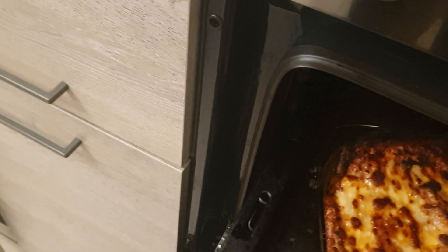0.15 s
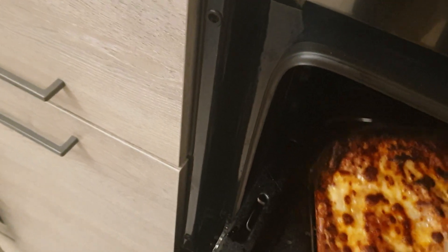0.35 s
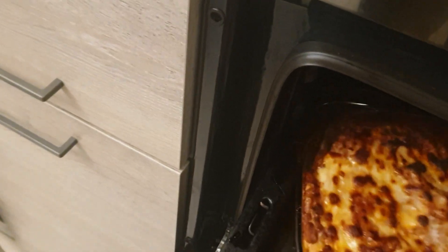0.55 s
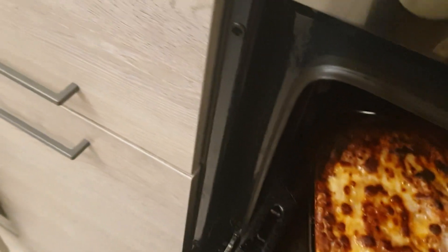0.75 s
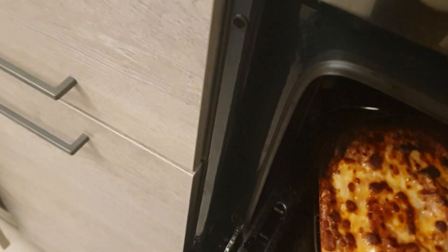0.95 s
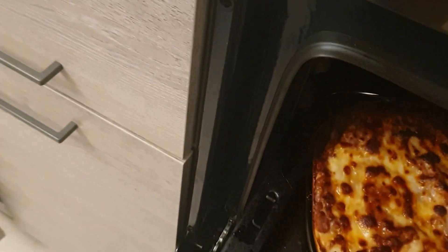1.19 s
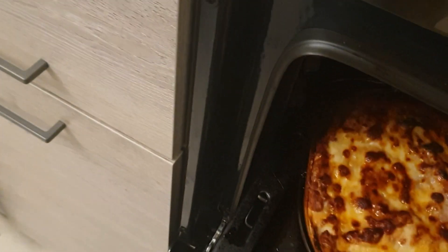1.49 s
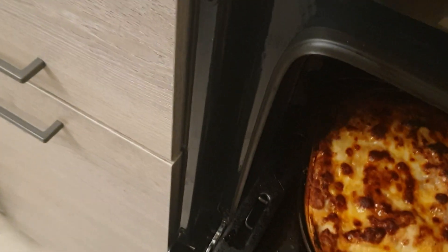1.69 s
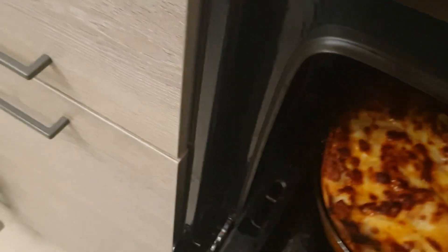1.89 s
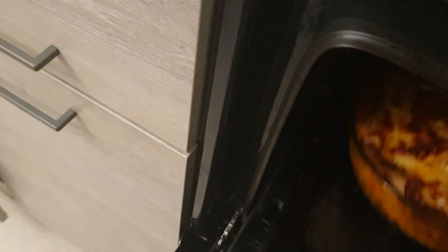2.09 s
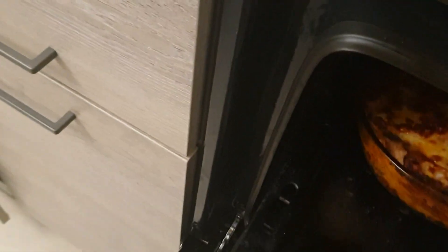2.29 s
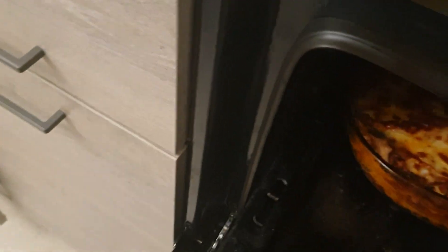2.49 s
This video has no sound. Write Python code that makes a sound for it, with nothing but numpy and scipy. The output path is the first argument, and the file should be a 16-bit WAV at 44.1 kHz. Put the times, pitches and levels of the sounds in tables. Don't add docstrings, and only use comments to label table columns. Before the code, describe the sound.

A glass baking dish drags over an oven's wire rack, a gritty cloth-and-glass hiss swelling from 0.1 to 0.5 seconds. A boomy metallic knock with quick rebound lands at 0.56, more rubbing follows, then a shorter, duller knock at 1.47. Light clacks near 1.96 lead to the loudest rattling double bang at 2.12 and a bump at 2.27. Faint sizzle and fan hum underlie it; short kitchen reverberation.

```python
import sys
import numpy as np
from scipy import signal
from scipy.fft import rfft, irfft, next_fast_len
from scipy.io import wavfile
from scipy.ndimage import uniform_filter1d, map_coordinates

SR = 44100
rng = np.random.default_rng(int(sys.argv[2]) if len(sys.argv) > 2 else 0)


def master_out(mix):
    frames = np.transpose(np.atleast_2d(mix))
    ceiling = np.clip(frames, -1, 1)
    pcm = np.round(ceiling * 32767).astype(np.int16)
    wavfile.write(sys.argv[1], SR, pcm)


def volts_from_db(level):
    exponent = np.asarray(level, float) / 20
    return 10 ** exponent


N = 116865

# (frequency [Hz], level [dB per Hz])
HUM_COLOUR = [(22, -2.5), (60, 3.5), (200, -17), (480, -8), (750, -12), (1500, -19.5), (5000, -26),
              (15800, -24)]
# (frequency [Hz], level [dB per Hz])
RUMBLE_COLOUR = [(25, 4), (55, -4.5), (130, 6.5), (250, -3.5), (500, -10.5), (1000, -14), (1500, -50)]
# (time [s], level [dB])
RUMBLE_LEVEL = [(0, -56.5), (.2, -44), (.33, -54), (.55, -40.5), (.9, -49.5), (1.1, -47.5), (1.5, -49.5),
                (1.82, -50.5), (2.0, -37), (2.07, -40.5), (2.2, -35), (2.45, -47), (2.65, -61.5)]
# (frequency [Hz], width [Hz], level [dB])
CAVITY_PEAKS = [(477, 31, 4.5), (708, 50, -8.5), (863, 18, -9.5), (1640, 110, 6), (2100, 78, 1),
                (2600, 79, 6)]

# (time [s], level [dB])
SIZZLE_LEVEL = [
    (0, -60),
    (.8, -59),
    (1.2, -57),
    (1.7, -58.5),
    (2.3, -69),
    (2.36, -78),
]
# (frequency [Hz], level [dB per Hz])
SIZZLE_COLOUR = [(2500, -48), (5000, 1), (11000, 2), (15800, -9)]

# (frequency [Hz], time to fall 60 dB [s])
ROOM_T60 = [(100, .55), (1000, .45), (4000, .4), (12000, .35)]

# (time [s], level [dB])
DRAG_LEVEL = [(0, -63), (.07, -58.5), (.12, -48.5), (.26, -48), (.33, -51.5), (.4, -45), (.45, -42),
              (.5, -39.5), (.55, -43), (.58, -53), (.7, -43.5), (.8, -53), (.95, -60.5), (1.04, -49.5),
              (1.15, -60.5), (1.43, -54), (1.55, -57.5), (2.085, -53.5), (2.12, -47.5), (2.31, -55),
              (2.36, -66)]
# (frequency [Hz], level [dB per Hz])
DRAG_COLOUR = [(35, -38), (130, -33), (400, -16), (1000, -14.5), (3000, -16), (4500, -18), (7500, -18),
               (15800, -22)]
# (frequency [Hz], width [Hz], level [dB])
RACK_PEAKS = [(140, 40, 14), (414, 60, 1), (945, 130, -2), (2060, 230, -11.5), (2590, 350, 0.5)]

# (time [s], peak [dB], frequency [Hz], rise [s], time to fall 60 dB [s])
CAVITY_BOOMS = [(0.14, -34.5, 137.2, 0.032, 0.37), (.42, -32.5, 396, 0.013, 0.14),
                (0.5646, -14, 194, 0.014, 0.25), (.567, -14, 166, 0.0041, 0.18),
                (.562, -19, 291, 0.003, 0.15), (.58, -29, 253, .01, 0.43),
                (0.5632, -12.5, 89.7, 0.011, 0.21), (0.572, -17.5, 125, 0.005, 0.22),
                (0.648, -22, 140, 0.0041, 0.11), (.72, -30, 118.4, 0.0065, .12),
                (1.158, -26.5, 122.5, 0.018, 0.13), (1.468, -26, 202, 0.0022, 0.086),
                (1.477, -21, 99, 0.0035, 0.18), (1.501, -38, 54.6, 0.055, 0.78),
                (1.503, -11, 150, 0.0036, 0.053), (1.554, -25, 133, 0.0036, 0.079),
                (1.859, -34, 67.4, 0.024, 0.44), (1.87, -35.5, 143, 0.0092, .35),
                (1.953, -22.5, 197.5, 0.0075, 0.24), (1.965, -23.5, 103, 0.0067, 0.12),
                (2.085, -14, 195, 0.017, 0.28), (2.1134, -6, 161, 0.0046, 0.12),
                (2.111, -23, 117, 0.0047, .2), (2.115, -12, 259.6, 0.0029, 0.09),
                (2.15, -28.5, 288, 0.0066, 0.28), (2.117, -21, 107.4, 0.027, 0.25),
                (2.1321, -2, 155, 0.0058, 0.099), (2.175, -25, 155.5, 0.012, 0.3),
                (2.233, -28, 164, 0.0058, .08), (2.275, -10.5, 125.4, 0.0038, 0.068),
                (2.27, -24, 287, 0.0039, 0.096), (2.285, -21.5, 198.6, 0.0051, 0.29),
                (2.363, -19.5, 166.5, 0.0091, 0.086), (2.399, -34, 73.6, 0.031, 0.44)]

# (frequency [Hz], level [dB], time to fall 60 dB [s])
STOP_TONES = [(319, 3, .1), (389.6, -7.5, 0.27), (458, -13.5, 0.35), (518, -11, 0.12), (852, -8.5, 0.1),
              (979, -12.5, 0.37), (1210, -22, .2), (1574, -7, 0.084), (1990, -2.5, 0.06), (2230, -10, .06),
              (2597, 3.5, 0.036), (2785, -1.5, 0.053), (3087, -11.5, 0.07)]
RAIL_TONES = [(331, -8, 0.27), (478, -6.5, 0.18), (525.5, -3.5, 0.24), (895.5, -2, 0.2), (1620, -5, 0.35),
              (1640, -11, 0.23), (1700, 4.5, 0.07), (2013, -15, 0.13), (2350, 8, 0.049), (2640, -13.5, .3),
              (2860, -20, 0.061)]
WALL_TONES = [(496.4, -5, 0.3), (642, -8, 0.23), (961, -12, 0.28), (1089, -7.5, .17), (1567, -5, 0.19),
              (1755, -17, 0.17), (1954, -15, .2), (2213, -18, 0.22), (2596, -11, 0.11), (2845, -9, 0.22)]
DISH_TONES = [(322, -0.5, 0.19), (496.5, -7.5, 0.4), (613, 0, 0.19), (823, -9, 0.28), (920, -8, 0.28),
              (1494, -8.5, 0.085), (1565, -2, .22), (1700, -13, .12), (2100, -10, 0.086),
              (2300, -0.5, 0.086), (2610, -12, 0.088)]
# (time [s], ring [dB], clatter [dB], clatter time to fall 60 dB [s], rise [s])
STOP_CONTACTS = [
    (0.5604, -18.5, -21, 0.15, 0.00045),
    (.573, -20.5, -31, 0.44, 0.00046),
]
RAIL_CONTACTS = [
    (.985, -64, -65, 0.27, 0.0025),
    (1.346, -62, -66, 0.13, 0.0032),
    (1.468, -28.5, -31.5, 0.28, 0.0011),
    (1.487, -44, -43, 0.32, 0.0011),
]
WALL_CONTACTS = [
    (1.028, -58, -52, 0.46, 0.013),
    (2.092, -41.5, -37, 0.23, 0.0064),
    (2.114, -21, -29, 0.19, 0.00052),
    (2.119, -29, -27, 0.29, 0.00047),
    (2.132, -24.5, -30.5, 0.36, 0.00061),
    (2.25, -40, -43, 0.21, 0.0024),
    (2.273, -34.5, -38, 0.44, 0.0044),
]
DISH_CONTACTS = [
    (1.79, -49.5, -55, 0.18, 0.011),
    (1.955, -35.5, -38, 0.16, 0.0056),
    (1.972, -35.5, -40.5, 0.25, 0.0036),
    (1.992, -39, -45.5, 0.24, 0.0066),
]
# (frequency [Hz], level [dB per Hz])
CLATTER_COLOUR = [(150, -9.5), (270, -3), (530, -10.5), (1280, -16.5), (2000, -11.5), (2900, -11),
                  (3400, -20.5), (7000, -33.5), (15800, -46)]
# (frequency [Hz], share of the clatter time [ratio])
CLATTER_SHARE = [(300, 1.43), (1000, 2.34), (3000, 0.55), (8000, 1.9)]
CLATTER_TILT = [
    1,
    -9,
    0,
    -6,
]

# (frequency [Hz], likeness [0 to 1])
PORT_LIKENESS = [(60, 1), (300, 0.96), (640, 0.79), (1400, 0.046), (3000, 0.17), (8000, 0.19)]
# (frequency [Hz], left minus right [dB])
PORT_LEAN = [(60, -4.5), (300, -2), (1200, -1.2), (2500, 3), (6000, 3), (10000, -3.5)]
# (frequency [Hz], level [dB])
MIC_COLOUR = [(22, -30), (45, 0), (7300, 1.5), (8500, -6.5), (10500, -0.5), (13500, 1), (14500, -3.5),
              (15500, -0.5)]


def unit(x):
    return x / np.sqrt(np.mean(x ** 2) + 1e-20)


def along(points, hz):
    f, v = np.transpose(points)
    return np.interp(np.log(hz + 1), np.log(f + 1), v)


def curve(rows):
    return np.interp(np.arange(N) / SR, *np.transpose(rows))


def wobble(rate, size=N):
    knots = rng.standard_normal(int(N * 90 / SR) + 8)
    return map_coordinates(knots, [np.arange(size) * min(rate, 90) / SR])


def filtered(x, response):
    n = x.shape[-1]
    m = next_fast_len(n + SR // 4)
    return irfft(rfft(x, m) * response(np.fft.rfftfreq(m, 1 / SR)), m)[..., :n]


def resonant(x, peaks):
    def response(f):
        ringing = sum(volts_from_db(db) * 1j * f * width / (centre * centre - f * f + 1j * f * width)
                      for centre, width, db in peaks)
        return 1 + ringing
    return filtered(x, response)


def half_angle(hz):
    return np.arccos(np.clip(along(PORT_LIKENESS, hz), -1, 1)) / 2


def paired(pair, spectrum):
    def response(hz):
        return volts_from_db(along(spectrum, hz)) * [np.cos(half_angle(hz)), np.sin(half_angle(hz))]
    mid, side = filtered(pair, response)
    return unit(np.array([mid + side, mid - side]))


def dying(t60_of, size):
    hz, t, z = signal.stft(rng.standard_normal((2, size)), SR, nperseg=128)
    fading = z * volts_from_db(-60 * t / t60_of(hz)[:, None])
    return signal.istft(fading, SR, nperseg=128)[1][:, :size]


def hum():
    rumble = paired(resonant(rng.standard_normal((2, N)), CAVITY_PEAKS), RUMBLE_COLOUR)
    rumble = rumble * volts_from_db(curve(RUMBLE_LEVEL) + 2.0 + 1.4 * wobble(22.06))
    fan = paired(resonant(rng.standard_normal((2, N)), CAVITY_PEAKS), HUM_COLOUR)
    return volts_from_db(-51.5 + 0.27 * wobble(1.7)) * fan + rumble


def sizzle():
    spits_per_s, spread_db = 500, 4
    bursts = rng.random(N) < spits_per_s / SR
    pops = bursts * volts_from_db(spread_db * np.minimum(rng.exponential(size=N), 3))
    puffs = uniform_filter1d(pops, size=40) * rng.standard_normal((2, N))
    return volts_from_db(curve(SIZZLE_LEVEL)) * paired(puffs, SIZZLE_COLOUR)


def kitchen(x):
    out, step = np.zeros((2, N + 2 * SR)), SR // 3
    for start in range(0, N, step):
        tail = dying(lambda f: along(ROOM_T60, f), size=SR * 3 // 4)
        tail = paired(tail, [(20, 0.0045), (20000, 0)])
        wet = signal.fftconvolve(x[None, start:start + step], tail / np.linalg.norm(tail[0]), axes=1)
        out[:, start + 200:][:, :wet.shape[1]] += wet
    return out[:, :N]


def drag():
    grains_per_s, spread_db, grain_db = 1500, 3, -8
    grains = rng.random((2, N)) < grains_per_s / SR
    grit = grains * volts_from_db(spread_db * np.minimum(rng.exponential(size=(2, N)), 4))
    grit = unit(grit * rng.standard_normal((2, N)))
    rub = resonant(rng.standard_normal((2, N)) + volts_from_db(grain_db) * grit, RACK_PEAKS)
    stutter_db = 1.2 * (wobble(70) + wobble(35.11))
    return volts_from_db(curve(DRAG_LEVEL) + 4 + stutter_db) * paired(rub, DRAG_COLOUR)


def booms():
    out, t = np.zeros(N + SR), np.arange(SR // 2) / SR
    for s, db, hz, rise, t60 in CAVITY_BOOMS:
        swell = (1 - np.exp(-t / rise)) * volts_from_db(db - 60 * t / t60)
        wander = 0.15 * wobble(32.0, size=len(t))
        out[round(s * SR):][:len(t)] += swell * np.sin(2 * np.pi * hz * t + wander)
    return out[:N]


def ringing(tones, t):
    hz, db, t60 = np.transpose(tones)[:, :, None]
    apart = half_angle(hz) * rng.standard_normal(hz.shape)
    wander = 0.5 * np.array([wobble(83.6, size=len(t)) for _ in tones])
    phase = 2 * np.pi * hz * t + wander + 2 * np.pi * rng.random(hz.shape)
    buzz_db = 3.5 * np.array([wobble(29.4, size=len(t)) for _ in tones]) * np.minimum(t / 0.014, 1)
    level = volts_from_db(db + buzz_db - 60 * t / t60)
    return np.array([(level * np.sin(phase + side * apart)).sum(0) for side in (1, -1)])


def clattering(t60, tilt_db, t):
    clatter = paired(dying(lambda f: t60 * along(CLATTER_SHARE, f), size=len(t)), CLATTER_COLOUR)
    clatter = filtered(clatter, lambda f: volts_from_db(tilt_db * np.log2(np.maximum(f / 3000, 1))))
    start_rms = np.sqrt(np.mean(clatter[:, :SR // 100] ** 2))
    crack_db, crack_t60 = 3.5, 0.051
    return clatter / start_rms * (1 + volts_from_db(crack_db - 60 * t / crack_t60))


def knocks():
    out, t = np.zeros((2, N + SR)), np.arange(SR // 2) / SR
    places = (STOP_TONES, RAIL_TONES, WALL_TONES, DISH_TONES)
    contacts = (STOP_CONTACTS, RAIL_CONTACTS, WALL_CONTACTS, DISH_CONTACTS)
    for tones, tilt_db, hits in zip(places, CLATTER_TILT, contacts):
        for s, ring_db, clatter_db, t60, rise in hits:
            ring = volts_from_db(ring_db) * ringing(tones, t)
            clatter = volts_from_db(clatter_db) * clattering(t60, tilt_db, t)
            out[:, round(s * SR):][:, :len(t)] += (ring + clatter) * (1 - np.exp(-t / rise))
    return out[:, :N]


def scene():
    clack, boom = knocks(), booms()
    room = kitchen(volts_from_db(-8.5) * clack.mean(0) + volts_from_db(-15) * boom)
    return clack + boom + room + drag() + hum() + sizzle()


def low_pass(x):
    return signal.sosfilt(signal.butter(12, 15830, fs=SR, output="sos"), x)


def record(dry):
    top_hz, lag_s, lag_top_hz = 15830, 0.0002, 1300
    side = np.array([[1], [-1]])

    def response(hz):
        colour = volts_from_db(along(MIC_COLOUR, hz) + side * along(PORT_LEAN, hz) / 2)
        delay = np.exp(-1j * np.pi * np.minimum(hz, lag_top_hz) * lag_s * side)
        return (hz < top_hz) * colour * delay
    return low_pass(filtered(dry, response))


dry = scene()
out = record(dry)
master_out(out)
```